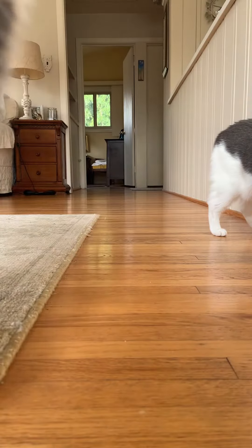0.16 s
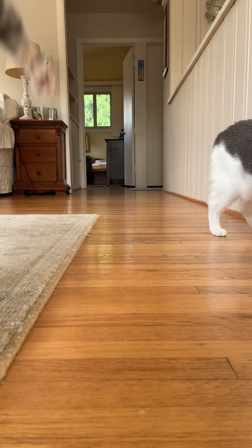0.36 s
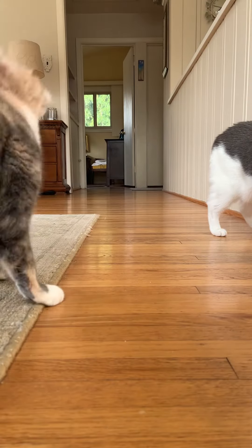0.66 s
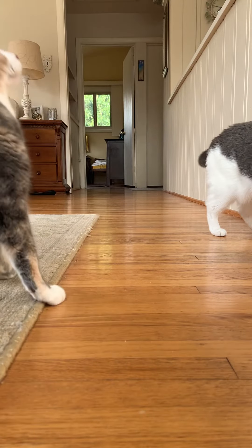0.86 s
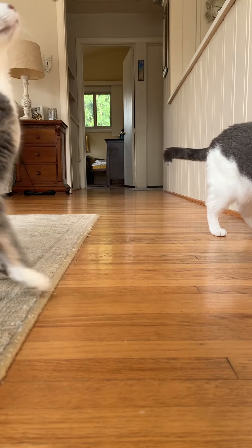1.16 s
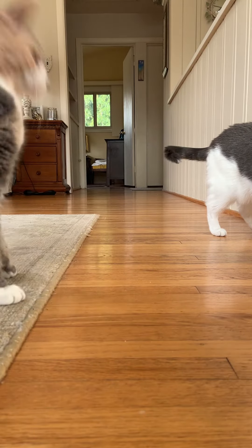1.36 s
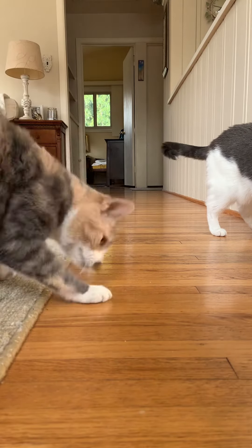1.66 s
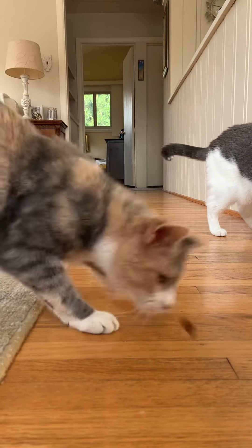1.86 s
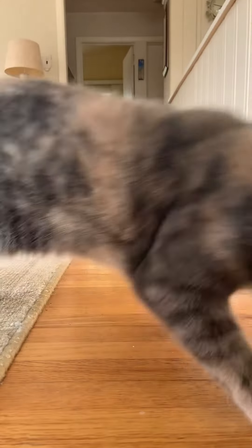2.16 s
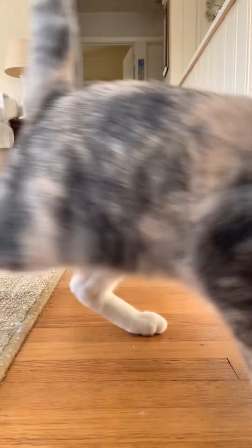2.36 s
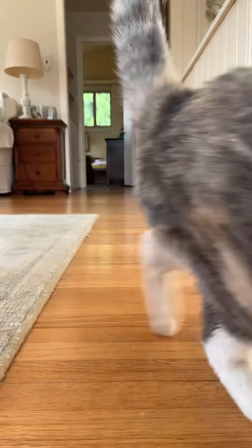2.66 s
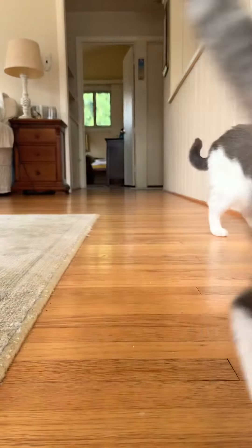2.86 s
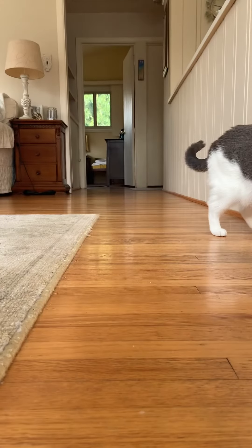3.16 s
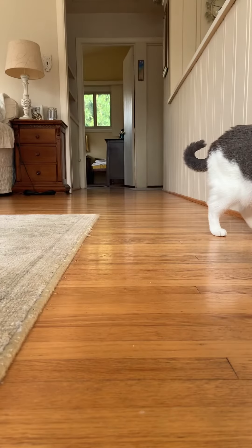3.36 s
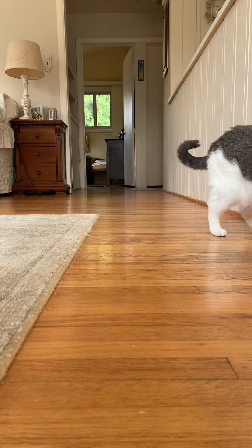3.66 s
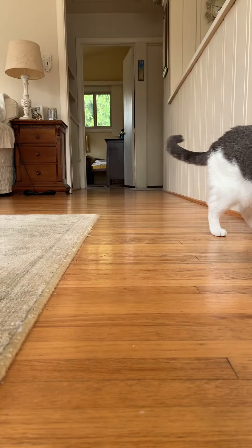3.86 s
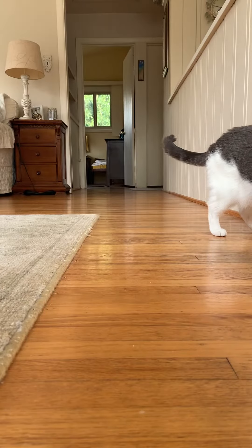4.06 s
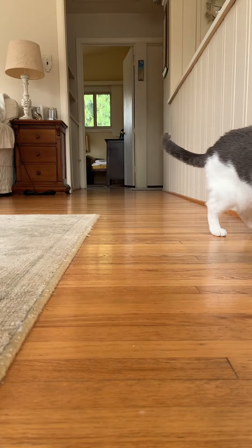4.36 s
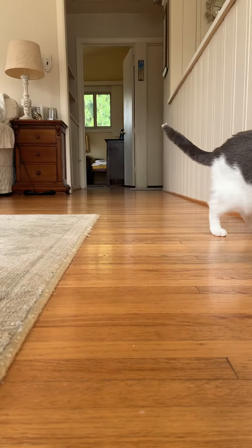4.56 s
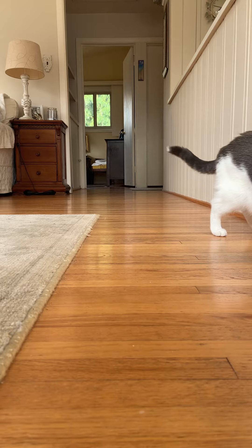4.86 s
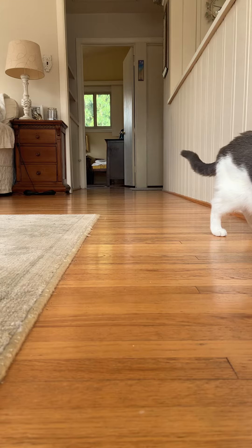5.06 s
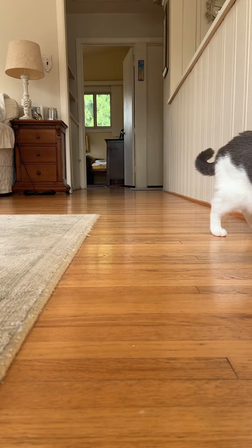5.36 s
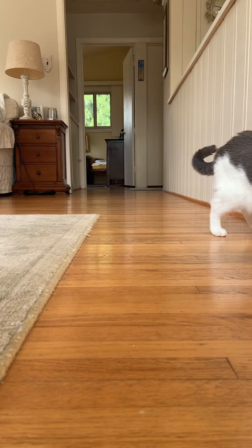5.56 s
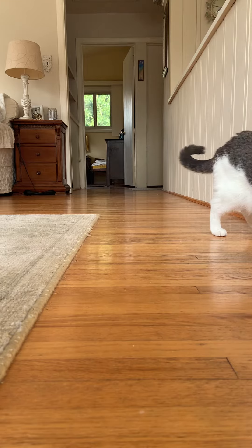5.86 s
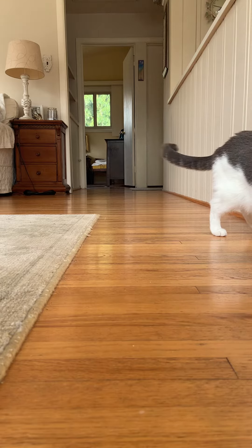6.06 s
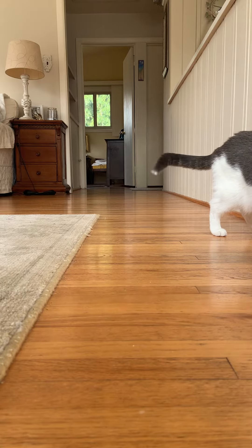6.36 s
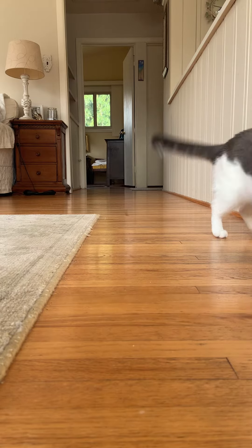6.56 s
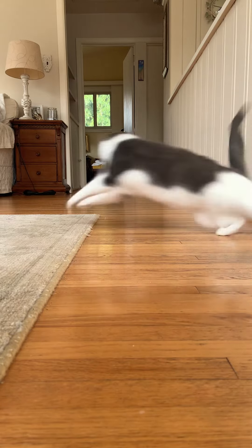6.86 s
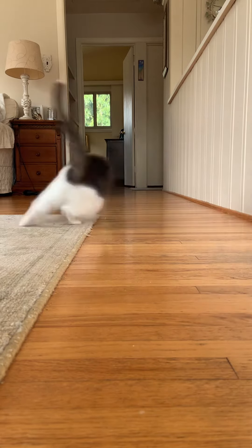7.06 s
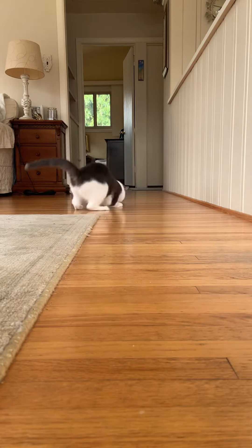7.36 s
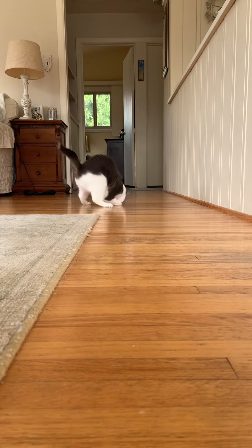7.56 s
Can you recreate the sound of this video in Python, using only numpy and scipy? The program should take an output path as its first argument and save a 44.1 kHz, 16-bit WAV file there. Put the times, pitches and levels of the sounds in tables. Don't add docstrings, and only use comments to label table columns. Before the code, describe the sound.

In a quiet, slightly echoing hallway, soft cat footfalls give way to hard dry treats clicking on hardwood, bouncing in quickening ticks. Paws and claws patter and skid lightly after them. After a lull, another treat clacks and rolls away in small ticks. Finally a deep double thud launches a gallop, with scratching claws and ringing boards. A floor-level phone microphone picks up faint hiss and low house rumble.

```python
import sys
import numpy as np
from scipy import signal
from scipy.fft import rfft, irfft, next_fast_len
from scipy.io import wavfile
from scipy.ndimage import uniform_filter1d, map_coordinates

SR = 44100
rng = np.random.default_rng(int(sys.argv[2]) if len(sys.argv) > 2 else 0)


def field_ratio(decibels):
    return 10 ** (np.asarray(decibels, dtype=float) / 20)


def persist_wave(psi):
    counts = np.round(np.clip(psi, -1, 1) * 32767).astype(np.int16)
    wavfile.write(sys.argv[1], SR, np.atleast_2d(counts).T)


N = 340011


def unit(x):
    return x / np.sqrt(np.mean(x ** 2) + 1e-20)


def peak(x):
    return x / np.abs(x).max()


def late(x, ms):
    return np.roll(x, round(ms * SR / 1000))


def along(points, hz):
    f, v = np.transpose(points)
    return np.interp(np.log(hz + 1), np.log(f + 1), v)


def wobble(rate, size):
    knots = rng.standard_normal(int(size * rate / SR) + 4)
    return map_coordinates(knots, [np.arange(size) * rate / SR])


def filtered(x, response):
    m = next_fast_len(x.shape[-1] + 8192)
    spectrum = rfft(x, m) * response(np.fft.rfftfreq(m, 1 / SR))
    return irfft(spectrum, m)[..., :x.shape[-1]]


def resonances(modes):
    def response(f):
        total = 0
        for k, (centre, width, db) in enumerate(modes):
            mode = 1j * f * width / (centre * centre - f * f + 1j * f * width)
            total = total + (-1) ** k * field_ratio(db) * mode
        return total
    return response


def noise(spectrum):
    return unit(filtered(rng.standard_normal((2, N)), lambda hz: field_ratio(along(spectrum, hz))))


# (centre [x note], width [x note], level [dB])
TREAT_BODY = [(0.622, 0.69, -9), (1, 0.17, -1), (1.9, 0.85, -14)]
# (centre [Hz], width [Hz], level [dB])
EDGE_SNAP = [(4760, 4400, 4.5)]
# (centre [Hz], width [Hz])
SHARP_INSTANT = (8480, 6700)
# (centre [Hz], width [Hz], level under top octave [dB], later gain [dB], gain from [s])
FINE_TIP = (14300.5, 3600.5, -27, 20, 6.5)
# (centre [Hz], width [Hz], level under edge snap [dB])
TREAT_RING = [(3540, 330, -13), (6300, 520, -13)]
# (centre [Hz], width [Hz], level [dB])
PLANK = [(404.8, 82, 3), (835, 85, -0.5)]


def contact(s, knock_db, snap_db, air_db, note_hz):
    t = np.arange(3072) / SR
    lasts_s = 0.0026 * field_ratio(np.clip(-.3 * air_db, 0, 12))
    grit = np.clip(.15 - air_db / 40, .22, 1)
    crack = (grit * rng.uniform(-0.96, 1, len(t)) + (t == 0)) * field_ratio(-60 * t / lasts_s)
    crack = late(crack, 3)

    def band(response):
        spread = lambda f: 1j * np.exp(-2j * np.pi * 0.063 * np.sqrt(f))
        return peak(filtered(crack, lambda f: np.abs(response(f)) * spread(f)))

    body = resonances([(c * note_hz, w * note_hz, level) for c, w, level in TREAT_BODY])
    body_top_hz = (1.61 + min(field_ratio(snap_db), 1)) * note_hz
    tick = band(lambda f: body(f) / (1 + (f / body_top_hz) ** 8))

    stretch = field_ratio(np.clip(0.57 * (air_db - snap_db) - 2.5, -3.5, 3.5))
    sharp_hz, sharp_width_hz = SHARP_INSTANT
    sharp = resonances([(sharp_hz * stretch, sharp_width_hz * stretch, 0)])
    tip_hz, tip_width_hz, tip_db, tip_gain_db, tip_from_s = FINE_TIP
    tip = resonances([(tip_hz, tip_width_hz, 0)])
    snap = field_ratio(snap_db) * band(lambda f: resonances(EDGE_SNAP)(f) ** 4)
    snap = snap + field_ratio(air_db) * band(lambda f: sharp(f) ** 4)
    snap = snap + field_ratio(air_db + tip_db + tip_gain_db * (s > tip_from_s)) * band(lambda f: tip(f) ** 2)
    for centre, width, level in TREAT_RING:
        ring_db = snap_db + level + rng.normal(0, 1.6)
        ring = resonances([(centre * rng.uniform(1.0, 1.08), width, 0)])
        snap = snap + field_ratio(ring_db) * late(peak(filtered(np.roll(crack, -132), ring)), 3.4)

    knock = field_ratio(knock_db) * peak(filtered(field_ratio(-60 * t / 0.0055), resonances(PLANK)))
    return tick, snap, knock


# (frequency [Hz], t60 [s])
HALL = [(200, 0.39), (600, 0.35), (1500, 0.41), (4000, 0.34), (9000, 0.26), (15000, 0.22)]


def hall():
    hz, t, z = signal.stft(rng.standard_normal((2, SR // 2)), SR, nperseg=256)
    z = z * field_ratio(-60 * t / along(HALL, hz)[:, None])
    tail = signal.istft(z, SR, nperseg=256)[1][:, :SR // 2]
    tail = tail * (0.13 + 1 / (1 + np.exp((.02 - np.arange(SR // 2) / SR) / 0.0098)))
    return tail / np.linalg.norm(tail[0])


# (time [s], delay [ms], level [dB])
SIDE_WALL = [(1.369, 0.7, -8), (1.44, 0.41, -2.5), (1.67, 1.08, -18), (3.001, 3.2, -1), (4.201, 1.5, 1),
             (4.428, 1.6, -8), (4.851, 1.52, -4), (6.429, 1.63, -11), (7.301, 1.9, -5)]
# (time [s], end wall delay [ms], end wall [dB], room [dB], ceiling [dB])
ALONG_HALL = [(1.44, 30, -15.5, -8.5, -30), (1.67, 20, -23.5, -12, -23), (3.001, 16, -17.5, -14, -24.5),
              (4.201, 29, -15, -2, -10), (4.428, 16, -22, -10.5, -25.5), (4.851, 20, -26, -9, -27.5),
              (6.429, 15.5, -4, -0.5, -10), (6.9, 12, -2.5, 2.5, -12.5), (7.055, 11.5, 1.5, 3, -14),
              (7.27, 12, -25.5, -3, -28)]


def clicks(contacts):
    ceiling_ms, scatter_s = 19, .0025
    knock_room = 0.37
    out, t = np.zeros((2, N + SR)), np.arange(3072) / SR

    def at(rows, s):
        times, *columns = np.transpose(rows)
        return [np.interp(s, times, column) for column in columns]

    for s, db, knock_db, snap_db, air_db, note_hz in contacts:
        tick, snap, knock = contact(s, knock_db, snap_db, air_db, note_hz)
        side_ms, side_db = at(SIDE_WALL, s)
        end_ms, end_db, room_db, ceiling_db = at(ALONG_HALL, s)
        hard = tick + snap + late(knock, 4.823)
        treble = snap + 0.3 * tick
        pair = treble + field_ratio(side_db) * late(treble, side_ms)
        far = field_ratio(end_db) * late(pair, end_ms) + field_ratio(ceiling_db) * late(pair, ceiling_ms)
        rough = rng.standard_normal(len(t)) * field_ratio(-60 * t / scatter_s)
        far = signal.fftconvolve(far, rough / np.linalg.norm(rough))[:len(t)]
        dry = hard + field_ratio(side_db) * late(tick + snap, side_ms) + far
        into_room = hard - 0.13 * tick - (1 - knock_room) * late(knock, 4.9)
        wet = field_ratio(room_db) * signal.fftconvolve(into_room[None], hall(), axes=1)
        wet[:, :len(t)] += dry
        out[:, round((s - .0033) * SR):][:, :wet.shape[1]] += field_ratio(db - 2.5) * wet
    return out[:, :N]


# (time [s], peak [dB], plank knock [dB], edge snap [dB], note [Hz])
DROPS = [(1.37, -13, -12, -0.5, 2310), (1.4422, -17, -15, -6, 3440), (1.664, -30.5, 1.5, -3.5, 1690),
         (1.677, -26, 1, -1, 3700), (1.96, -25, -16.5, -7, 3730), (3.9931, -89.5, 1, 24, 1145),
         (4.2008, -16, -23.5, -1, 1930), (6.4294, -30, 5, 0.5, 1320), (6.432, -23.5, -3.5, -0.5, 3450),
         (6.709, -37, 4.5, 5, 3440), (6.9082, -38.5, 1.5, 3.5, 1450), (7.0564, -60.5, -14, 25.5, 1730),
         (7.0673, -59.5, 6, 12.5, 1740), (7.2477, -32.5, -2.5, -12.5, 1376), (7.2628, -55.5, 24, 24, 1670)]


def drops():
    rows = []
    for s, db, knock_db, snap_db, note_hz in DROPS:
        corner_db = 7 if s > 3.5 else 4.5
        rows.append((s, db, knock_db, snap_db, snap_db + corner_db, note_hz))
    return clicks(rows)


def low_contacts(spell, knock_db, air_db):
    knock_slope = 0.23
    return clicks([(s, db, knock_db + knock_slope * (db + 22.5), snap_db, snap_db + air_db, note_hz)
                   for s, db, snap_db, note_hz in spell])


# (time [s], peak [dB], edge snap [dB], note [Hz])
NEAR_ROLL = [
    (1.7991, -26.5, -23, 1310),
    (1.837, -25.5, -3.5, 1215),
    (1.9057, -30, -6, 1870),
    (1.9538, -32.5, -10, 1920),
    (1.9963, -28.5, 3.5, 2000),
    (2.0354, -35.5, 1, 2050),
    (2.0539, -37, -3, 3800),
    (2.0775, -42, 9, 1130),
    (2.0968, -39, -15, 1640),
    (2.1047, -46.5, 6, 2800),
]
# (time [s], peak [dB], edge snap [dB], note [Hz])
CHASE = [(2.2204, -43, -8, 2300), (2.241, -45.5, -1, 1320), (2.258, -65, -8, 1640),
         (2.3958, -46, -21, 1800), (2.4223, -47.5, -2.5, 1170), (2.4342, -48, -12, 1110),
         (2.4452, -52, 1, 1970), (2.6309, -42, -14, 2200), (2.671, -44, -15, 2210),
         (2.9472, -50, -29, 2660), (3.0051, -36.5, -12, 2004), (3.0891, -56.5, -7, 2220),
         (3.1506, -44, -2, 1580), (3.2101, -55, -2.5, 1600), (2.1487, -53.5, -12, 1120),
         (2.1871, -67, -12, 2030), (2.3772, -50, -17, 1865), (2.457, -50, -14, 1900),
         (2.466, -53, -15, 1790), (2.5179, -37.5, -2, 1190), (2.5279, -40.5, -3, 2060),
         (2.54, -35, -2, 2310), (2.554, -39, -0.5, 1180), (2.7199, -50, -19, 2110),
         (2.7294, -41, -18, 2050), (2.7518, -44, -11.5, 2060), (2.7878, -44, -15, 1620),
         (2.8481, -59, -13, 1780), (2.8641, -47, -21, 2340), (2.901, -56, -11, 1555),
         (3.3006, -61, -10, 1056)]
# (time [s], peak [dB], edge snap [dB], note [Hz])
FAR_ROLL = [(4.4302, -25.5, 3, 1640), (4.4365, -29, -11, 1500), (4.5168, -50, -27, 1240),
            (4.5306, -41, 5.5, 1160), (4.5726, -39, -13, 1320), (4.6186, -34, -1, 1230),
            (4.6397, -36.5, -3, 1180), (4.669, -33, -6.5, 1230), (4.8221, -42, -12, 2450),
            (4.8539, -39, -1, 2120), (4.8636, -43.5, 3.5, 1355), (5.1005, -35, -49, 2280),
            (5.4023, -46.5, -16.5, 2680), (5.6263, -48, -32.5, 2300), (4.4588, -43, -8, 2320),
            (4.7526, -56, -11, 1150), (5.029, -56.5, -20, 1920), (5.053, -53.5, -20, 1890),
            (5.3488, -55, -26, 1617), (5.4381, -60, -22.5, 1520), (5.495, -62.5, -24.5, 1750)]
# (time [s], peak [dB], edge snap [dB], note [Hz])
GALLOP = [(6.8107, -35.5, -5.5, 1090), (6.9946, -29, -13, 1150), (7.1471, -40, 13.5, 1180),
          (7.2792, -23, -17, 1900), (7.3124, -23.5, -7.5, 2110), (7.3969, -24, -4, 2480),
          (7.4272, -30.5, -22, 2090), (7.5235, -37.5, -1, 2400), (7.5434, -34, -5.5, 2200),
          (7.5924, -35.5, -5, 2220), (7.622, -42.5, 3, 1500), (6.791, -42, -5, 1640),
          (7.1532, -36.5, 2, 1920), (7.289, -37, -14, 1500), (7.305, -31, -8, 2600),
          (7.328, -29, -10, 1950), (7.339, -39, -19, 1900), (7.5278, -38, -8, 2170)]


def bounces_and_claws():
    return (low_contacts(NEAR_ROLL, knock_db=-6, air_db=-29)
            + low_contacts(CHASE, knock_db=-39, air_db=-16.5)
            + low_contacts(FAR_ROLL, knock_db=-30, air_db=-28)
            + low_contacts(GALLOP, knock_db=-16.5, air_db=-8.5))


# (time [s], peak [dB], plank knock [dB], note [Hz])
PADS = [
    (0.3088, -52, -20.5, 1420),
    (0.4963, -42, 2.5, 1370),
    (0.9221, -55.5, 12.5, 1190),
]


def pads():
    return clicks([(s, db, knock_db, -18, -11.5, note_hz) for s, db, knock_db, note_hz in PADS])


# (frequency [Hz], level [dB], t60 [s])
JOISTS = [(62, -10.5, 0.26), (104.2, -12.5, .24), (146, -12.5, 0.22), (210, -10.5, 0.13),
          (302.5, -12, 0.15), (422, -16.5, 0.09), (514, -21, 0.11)]
# (time [s], peak [dB], strongest note [Hz], t60
# [s])
PAWS = [(0.311, -41, 190.5, 0.2), (0.338, -45.5, 149, 0.2), (0.496, -39, 287, 0.1), (0.508, -33, 62, 0.31),
        (0.535, -41, 58, 0.24), (0.01, -55, 57, 0.28), (1.042, -60.5, 96, 0.16), (1.389, -40, 62, 0.12),
        (1.673, -37.5, 208, 0.5), (2.197, -43.5, 301, 0.13), (2.212, -36.5, 90.7, 0.11),
        (2.465, -50.5, 322, 0.16), (2.52, -41, 95, 0.065), (2.759, -39, 245, 0.37),
        (3.159, -65, 121.6, 0.18), (3.63, -50.5, 130, 0.49), (4.47, -42.5, 119.5, 0.34),
        (4.55, -52, 283, 0.32), (4.829, -49.5, 242, 0.25), (5.097, -51.5, 257, 0.16),
        (6.654, -32.5, 215.3, 1), (6.685, -24.5, 214, 0.39), (6.721, -31.5, 204, 0.4),
        (6.76, -34, 184, 0.27), (6.808, -35, 235, 0.5), (6.87, -38, 197, 0.65), (6.939, -33, 439, 0.07),
        (6.96, -13.5, 148, 0.095), (6.9663, -10, 107.5, .13), (6.996, -24, 218, 0.45),
        (7.023, -28.5, 175, 0.38), (7.058, -39, 195, 0.12), (7.149, -26.5, 113, 0.28),
        (7.236, -22, 158, 0.31), (7.25, -23, 115, 0.29), (7.305, -31.5, 200, 0.096),
        (7.449, -32.5, 132, 0.25), (7.36, -34.5, 178, 0.31), (7.51, -41, 152, 0.3), (7.584, -35, 129, 0.6),
        (7.64, -41, 203, 0.39)]


def paws():
    ring_db, left_db, room_db = -2.5, 1.9, -7
    out, t = np.zeros((2, N + SR)), np.arange(SR // 2) / SR
    for s, db, board_hz, t60 in PAWS:
        settling = t + 0.0015 * (1 - np.exp(-t / 0.0074))
        push = -np.sin(2 * np.pi * board_hz * settling) * field_ratio(-60 * t / 0.055)
        ring = 0
        for hz, level, decay in JOISTS:
            fading = field_ratio(ring_db + level + rng.normal(0, 2.9) - 60 * t / (decay * t60 / 0.28))
            phase = 2 * np.pi * hz * rng.uniform(.82, 1.2) * t + rng.uniform(0, 2 * np.pi)
            ring = ring + fading * np.sin(phase)
        thud = field_ratio(db) * (push * (1 - np.exp(-t / 0.0025)) + ring * (1 - np.exp(-t / 0.0033)))
        wet = field_ratio(room_db) * signal.fftconvolve(thud[None], hall(), axes=1)[:, :len(t)]
        out[:, round((s + .004) * SR):][:, :len(t)] += thud * field_ratio([[left_db], [-left_db]]) + wet
    return out[:, :N]


# (frequency [Hz], level [dB per Hz])
SCRAPE = [(250, 1.5), (500, -3), (900, -4.5), (2000, -5.5), (2600, -9), (3500, -20), (5000, -27),
          (16000, -89)]
# (frequency [Hz], level [dB per Hz])
FIZZ = [(1500, -28), (3800, 2), (4800, 0), (5600, -3.5), (7000, -22), (10000, -45), (16000, -45.5)]
# (frequency [Hz], level [dB per Hz])
SHEEN = [(3000, -58), (6000, 2), (8000, 0), (12000, -2), (16000, -17.5)]


def drag(strokes, rise, fade_db, top_db, low_hz, rough):
    rub_db, grit_db, glide_db = 1.5, 2.5, 3.5
    dulls = 0.25
    out = np.zeros((2, N + SR))
    press = lambda u: -fade_db * np.interp(u, [0, rise, 1], [1, 0, 1])
    for s, db, bright_db, note_hz, length in strokes:
        n, start = round(length * SR), round((s - rise * length) * SR)
        slips = grit_db * np.minimum(rng.exponential(size=n // 64 + 1), 3).repeat(64)[:n]
        grains = unit(field_ratio(rough * (0.73 * wobble(24, size=n) + 4.1 * wobble(259.4, size=n) + slips)))
        hz, t, z = signal.stft(grains * rng.standard_normal((2, n)), SR, nperseg=512)
        patches = uniform_filter1d(rng.standard_normal(z.shape[1:]), size=3, axis=0)
        patches = unit(uniform_filter1d(patches, size=6, axis=1))
        note = note_hz * field_ratio(glide_db * rng.uniform(-2, 2.5) * (t / length - rise))
        bump = field_ratio(8.1 * np.exp(-(np.log((hz[:, None] + 1) / note) / 0.51) ** 2))
        wood = field_ratio(along(SCRAPE, hz)) / (1 + (low_hz / (hz + 1)) ** 6)
        body = unit(bump * wood[:, None])
        top = unit(field_ratio(along(FIZZ, hz))) + field_ratio(top_db) * unit(field_ratio(along(SHEEN, hz)))
        shape = body + field_ratio(bright_db + dulls * press(t / length)) * top[:, None]
        z = z * shape * field_ratio(4.0 * np.sqrt(rough) * patches)
        rub = signal.istft(z, SR, nperseg=512)[1][:, :n]
        swell = field_ratio(db + rub_db + press(np.arange(n) / n)) * signal.windows.tukey(n, .15)
        out[:, start:start + n] += swell * rub
    return out[:, :N]


# (strongest moment [s], level [dB], brightness [dB], note [Hz], length [s])
SKIDS = [(1.72, -62.5, -7, 1310, 0.35), (1.99, -58, -3, 1880, 0.32), (2.214, -64, -0.5, 1660, 0.29),
         (2.43, -59, -12, 1330, 0.25), (2.528, -45, -5.5, 1560, 0.079), (2.585, -57.5, -3, 1710, .09),
         (2.66, -64.5, -6, 1920, 0.23), (2.79, -57.5, -14.5, 1800, 0.44), (3.0, -67.5, -1, 1730, 0.081),
         (3.144, -68, -12.5, 1726, 0.17), (4.47, -54, -12.5, 1933, 0.32), (4.68, -55.5, -9.5, 1170, .25),
         (4.87, -57.5, -2.5, 1960, 0.17), (5.055, -57.5, -20, 1850, .2), (1.668, -48.5, -3.5, 900, 0.038),
         (2.72, -68.5, -2, 2120, 0.13), (2.87, -61.5, -11, 1650, 0.15)]


def skids():
    return drag(SKIDS, rise=.3, fade_db=15, top_db=-25, low_hz=330, rough=.7)


# (strongest moment [s], level [dB], brightness [dB], note [Hz], length [s])
SCRAMBLE = [
    (6.744, -51.5, -2.5, 2020, .2),
    (6.804, -51, -4.5, 1440, 0.16),
    (6.924, -50, -6, 1750, .18),
    (7.002, -47.5, -18, 1000, .3),
    (7.14, -55, -2.5, 1570, 0.37),
    (7.27, -46, 0.5, 1790, 0.17),
    (7.325, -47, -4, 1900, .2),
    (7.41, -50.5, -9, 2270, 0.23),
    (7.538, -48, -16.5, 2270, .22),
]


def scramble():
    return drag(SCRAMBLE, rise=.25, fade_db=22, top_db=0.9, low_hz=130, rough=.9)


# (strongest moment [s], level [dB], brightness [dB], note [Hz],
# length [s])
BRUSHES = [
    (0.32, -78, -30, 1400, 0.059),
    (0.535, -73.5, -12, 1290, 0.14),
    (0.83, -83, -16, 1790, 0.13),
    (0.955, -74.5, -34, 700, .1),
    (3.7, -64.5, -12, 1375, .62),
    (6.204, -78.5, -11, 2030, .7),
    (6.66, -60.5, -15.5, 1100, 0.19),
]


def brushes():
    return drag(BRUSHES, rise=.6, fade_db=13, top_db=-1.5, low_hz=200, rough=.3)


# (strongest moment [s], level [dB], brightness [dB], note
# [Hz], length [s])
RUSTLES = [
    (4.125, -65, -14, 1890, .12),
    (5.23, -67, -34.5, 1103, 0.17),
    (5.36, -70.5, -28.5, 1490, 0.13),
    (5.46, -67, -35.5, 1470, 0.23),
    (5.58, -70, -40, 1670, 0.17),
    (5.3, -71, -29.5, 1600, 0.18),
]


def rustles():
    return drag(RUSTLES, rise=.4, fade_db=12, top_db=-25, low_hz=900, rough=.45)


# (frequency [Hz], level [dB per Hz])
HOUSE = [(12, -63), (20, -14), (59, 3.5), (82, -8), (129, -4), (167, -15), (228, -12.5), (286, -22.5),
         (365, -26), (600, -38), (780, -68.5), (1320, -120)]


def rumble():
    rest_db, shake_db, shake_slope, shake_s = -61.5, -36.5, 1, 0.091
    t = np.arange(N) / SR
    level = field_ratio(rest_db)
    for s, db, *_ in PAWS:
        since = np.clip(t - s, 0, None) / shake_s
        level = level + field_ratio(shake_db + shake_slope * db) * since * np.exp(1 - since)
    return level * field_ratio(2.0 * wobble(5.9, size=N)) * noise(HOUSE)


# (frequency [Hz], level [dB per Hz])
HISS = [(200, -11), (500, -3), (1000, -1.5), (2500, -4), (5000, -8.5), (10000, -10), (14400, -11.5),
        (15200, -21.5), (16500, -31)]


def hiss():
    return field_ratio(-79) * noise(HISS)


def scene():
    treats = drops() + bounces_and_claws()
    cats = pads() + paws() + skids() + scramble() + brushes() + rustles()
    return treats + cats + rumble() + hiss()


def ahead(x):
    smear_db, smear_s = -27.5, 0.017
    t = np.arange(1024) / SR
    smear = rng.standard_normal(len(t)) * field_ratio(-20 * t / smear_s)
    smear = smear[None, ::-1] / np.linalg.norm(smear)
    early = signal.fftconvolve(x, smear, axes=1)[:, len(t):len(t) + N]
    return x + field_ratio(smear_db) * np.pad(early, ((0, 0), (0, N - early.shape[1])))


# (frequency [Hz], share [0-1])
SHARED = [(60, 0.88), (250, 0.6), (600, 0.2), (2200, 0.018), (3500, 0.17), (4300, 0.88), (9000, 0.74),
          (13000, 0.82)]


def top_cut(x):
    return signal.sosfilt(signal.butter(12, 16560, fs=SR, output="sos"), x)


def record(dry):
    ports = lambda hz: (1j * hz / (30 + 1j * hz)) ** 3 / (1 + (hz / 16450) ** 150)
    left, right = filtered(dry, ports)
    share = lambda hz: np.clip(along(SHARED, hz), 0, 1)
    turn = lambda hz: np.exp(1j * (3.8 - 2 * np.pi * hz / 4300) * (1 - np.exp(-(hz / 900) ** 2)))
    borrowed = filtered(left, lambda hz: share(hz) * turn(hz))
    right = borrowed + filtered(right, lambda hz: (1 - share(hz)) * turn(hz))
    mix = ahead(np.array([left, right]))
    return top_cut(mix)


dry = scene()
out = record(dry)
persist_wave(out)
```